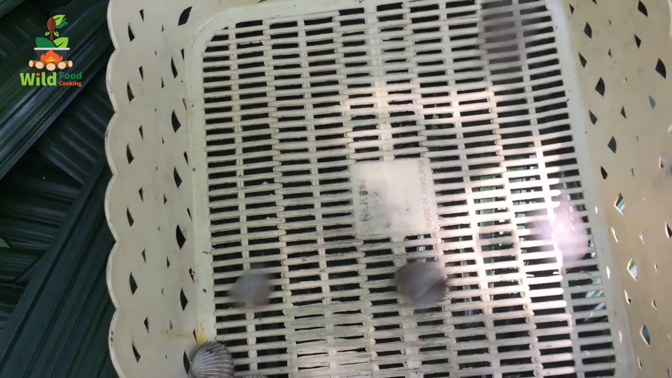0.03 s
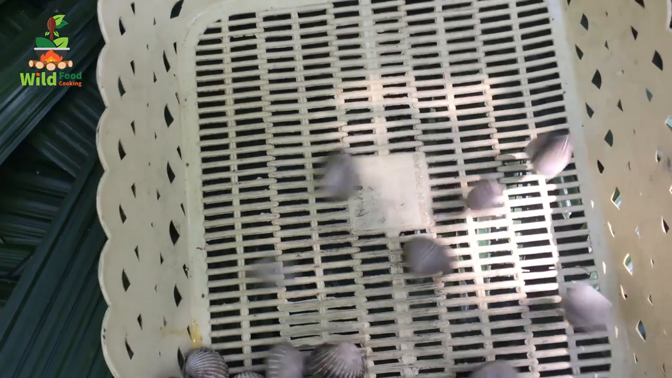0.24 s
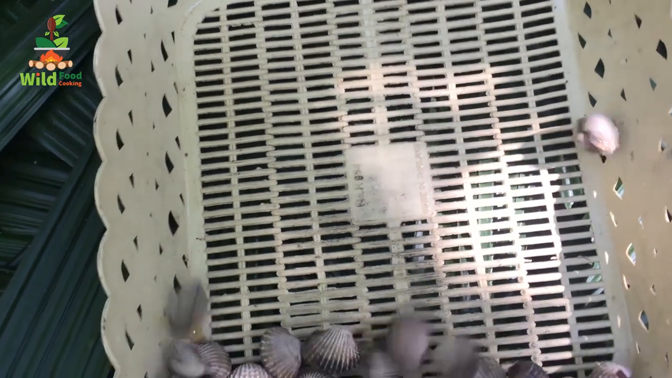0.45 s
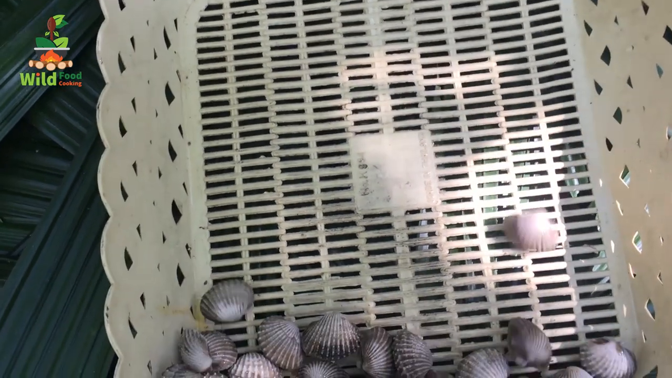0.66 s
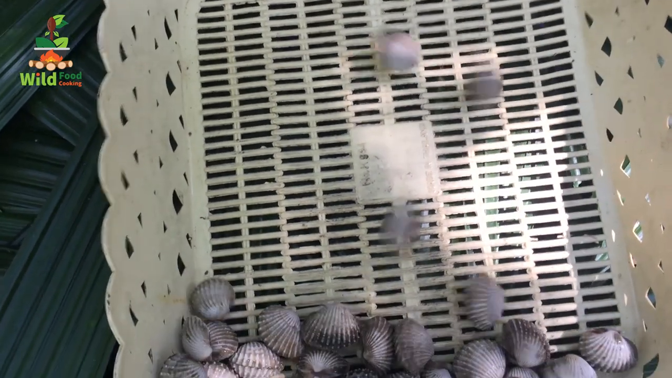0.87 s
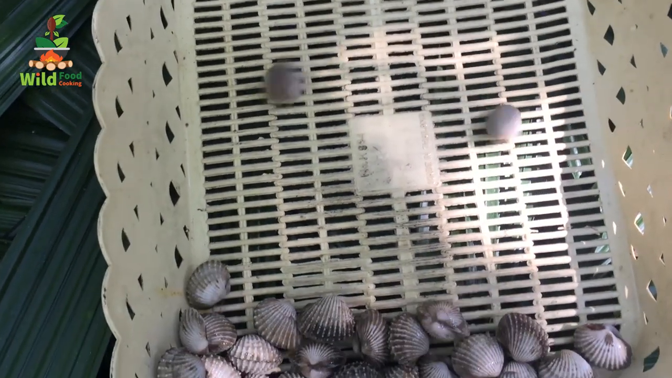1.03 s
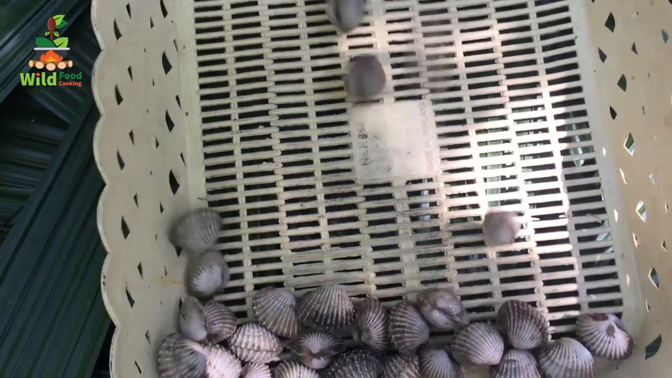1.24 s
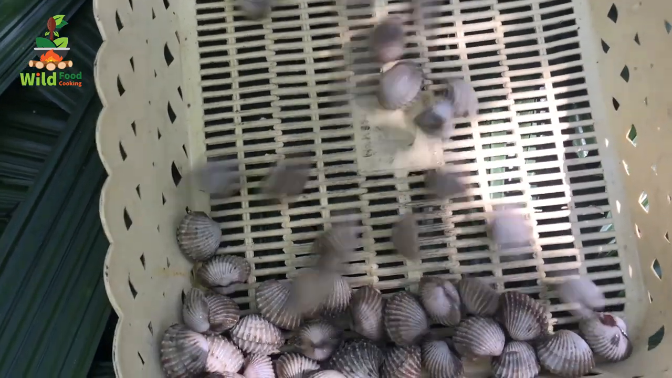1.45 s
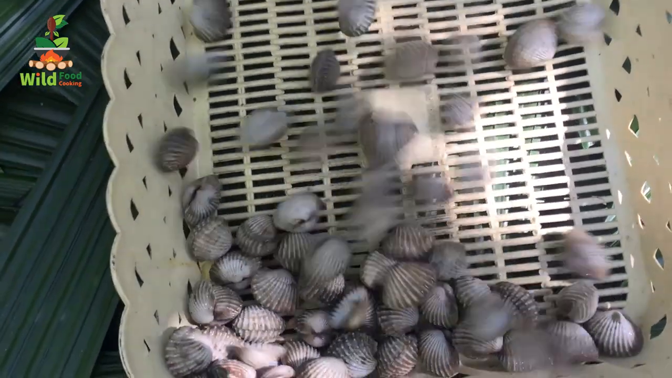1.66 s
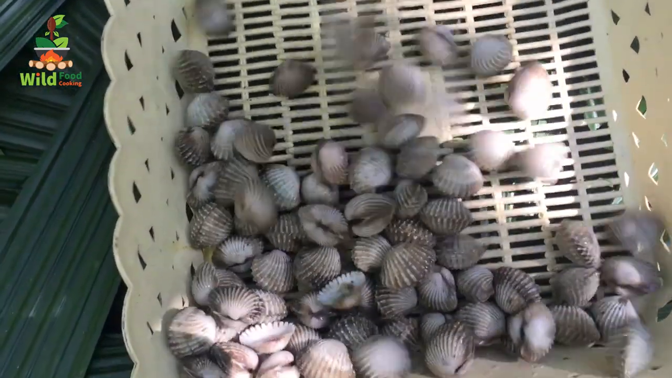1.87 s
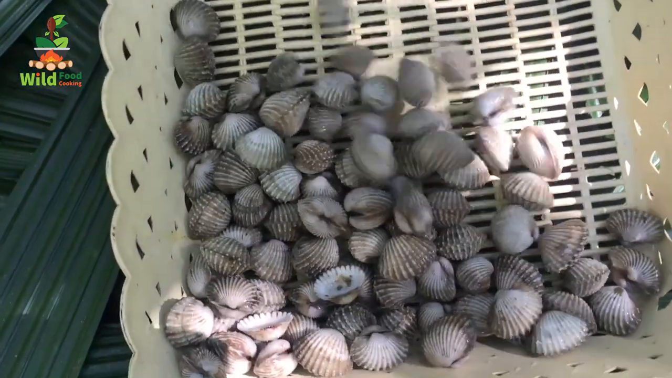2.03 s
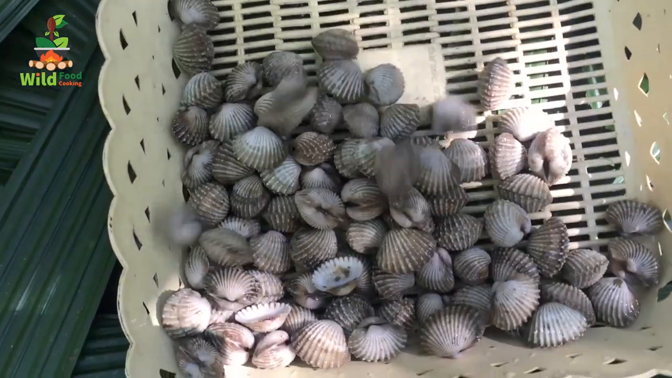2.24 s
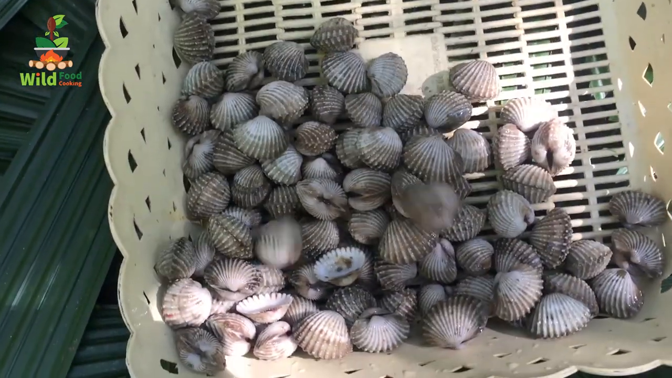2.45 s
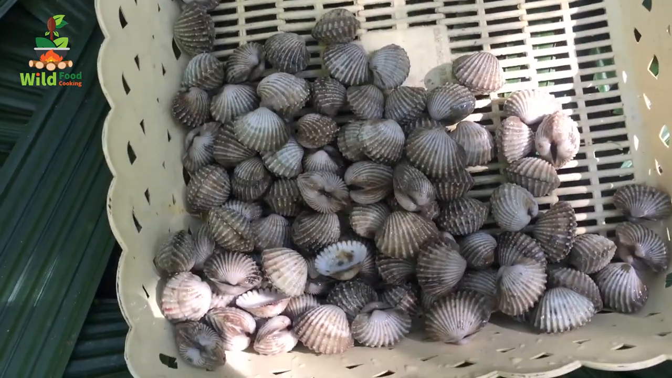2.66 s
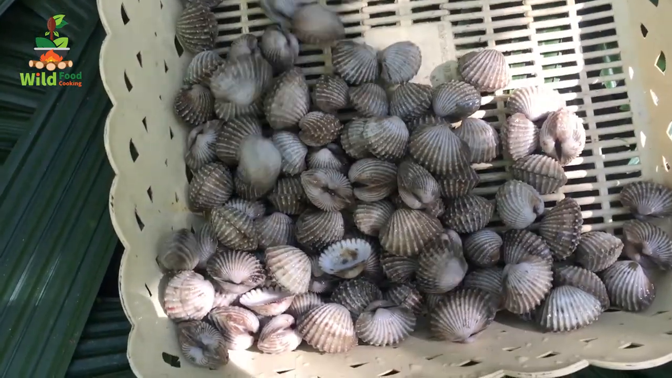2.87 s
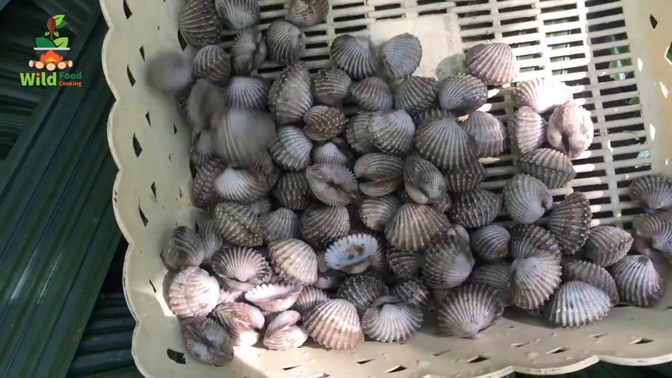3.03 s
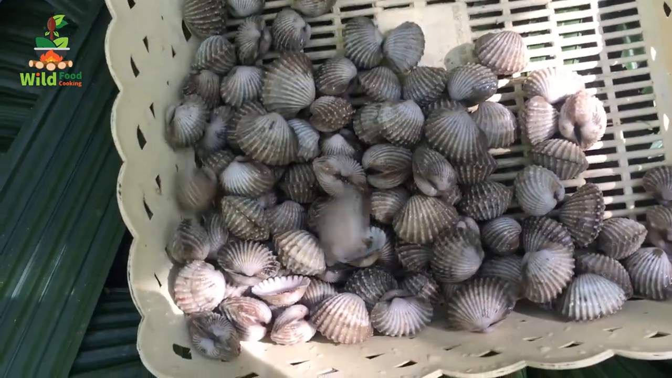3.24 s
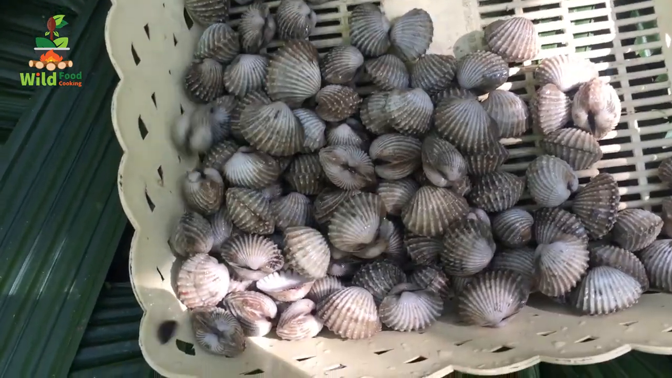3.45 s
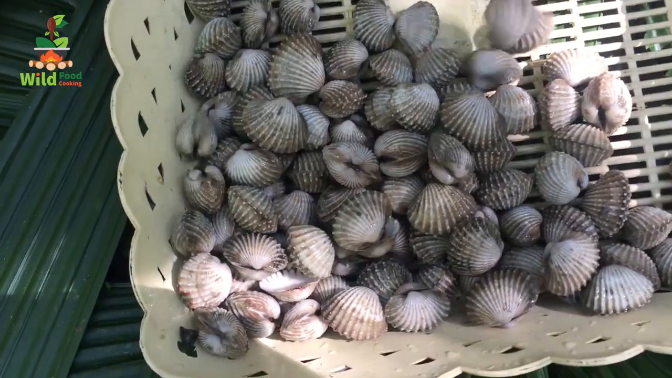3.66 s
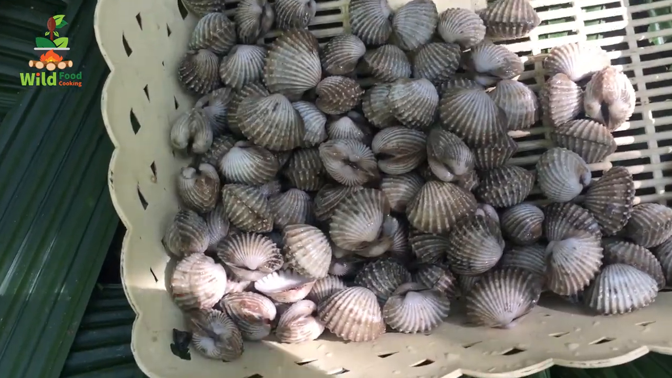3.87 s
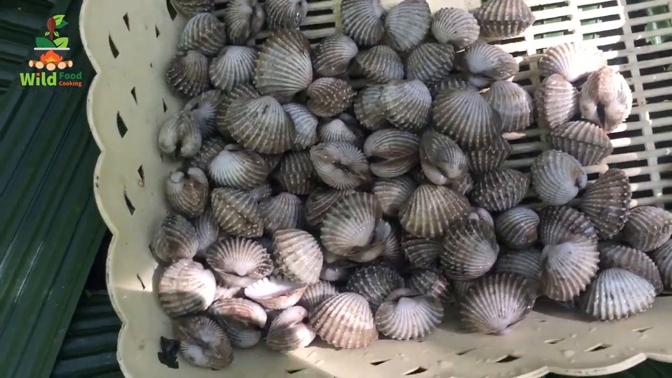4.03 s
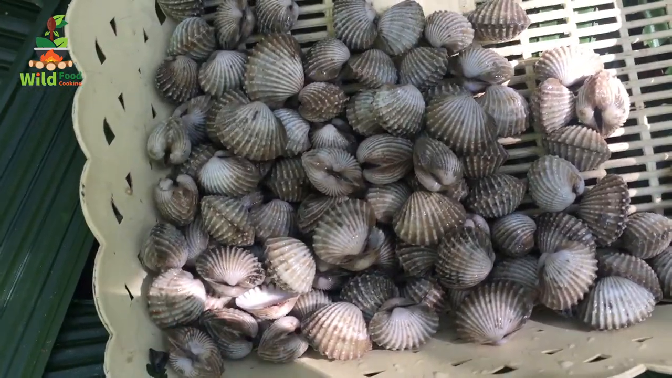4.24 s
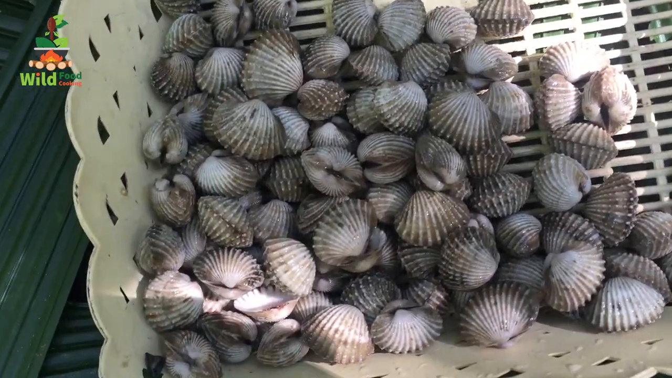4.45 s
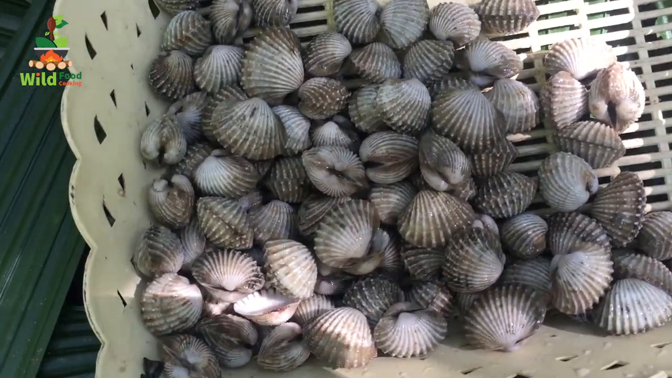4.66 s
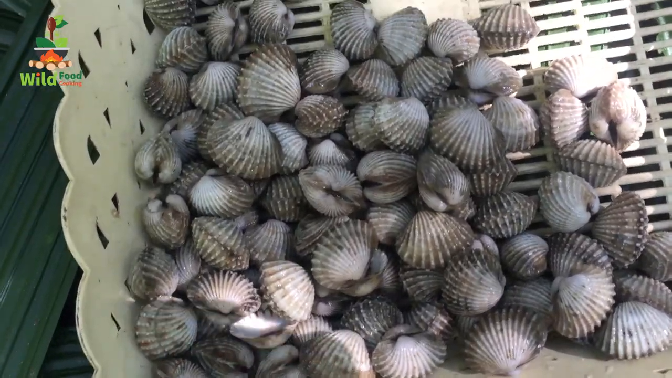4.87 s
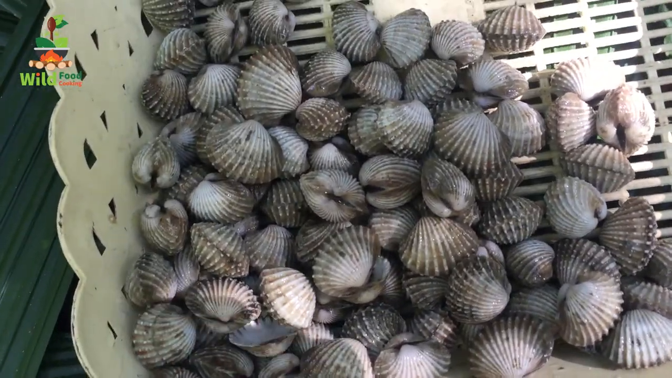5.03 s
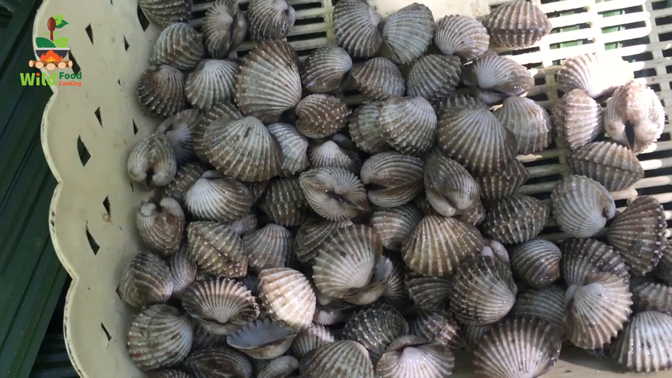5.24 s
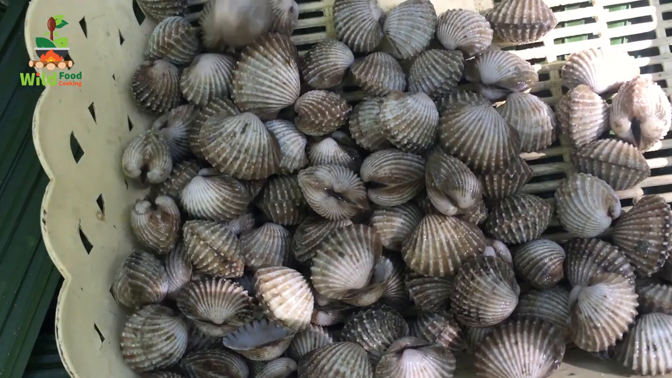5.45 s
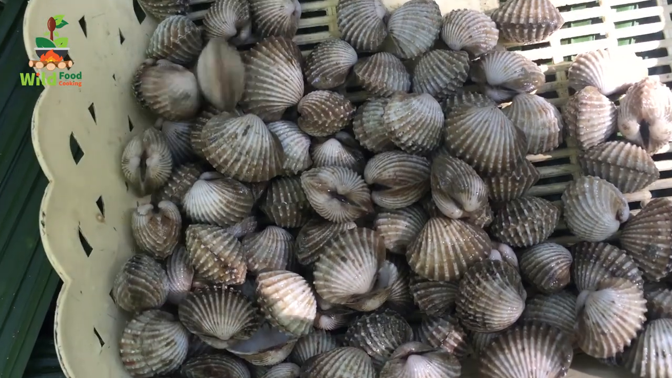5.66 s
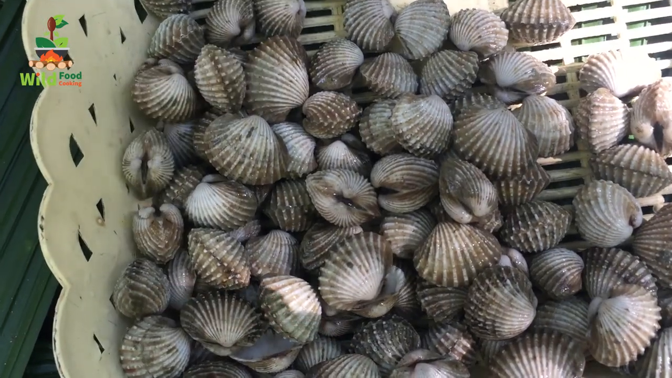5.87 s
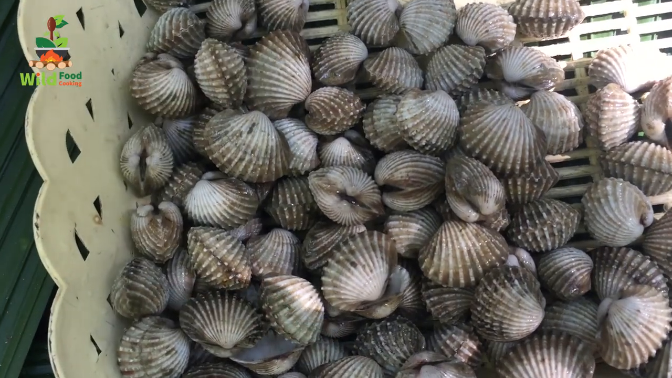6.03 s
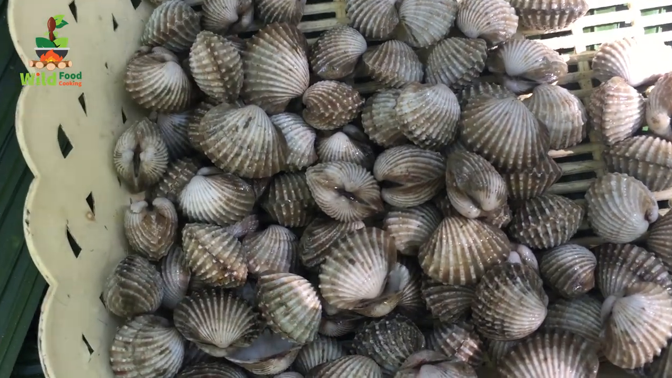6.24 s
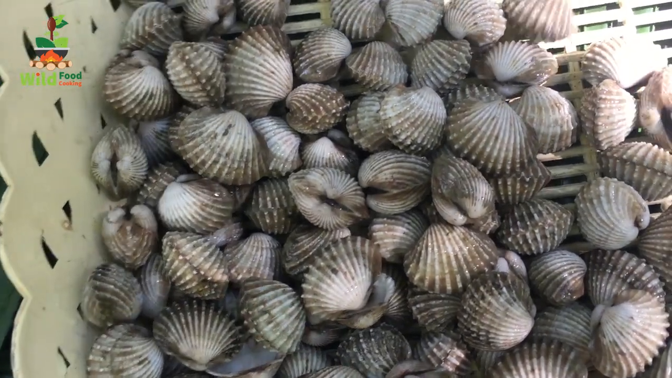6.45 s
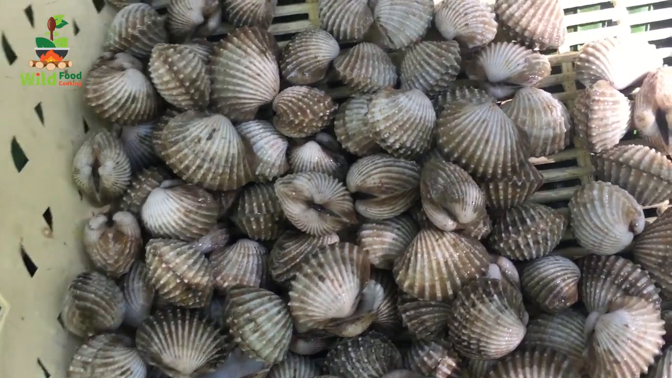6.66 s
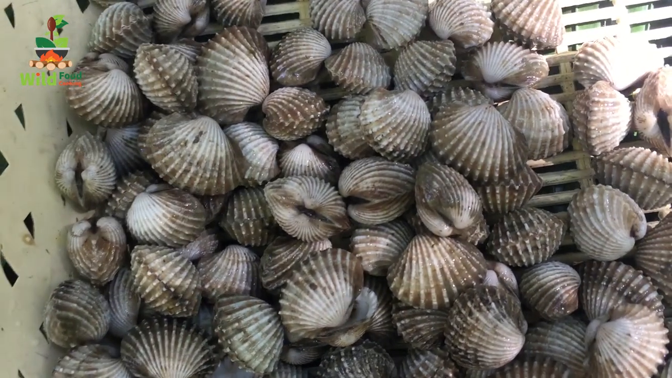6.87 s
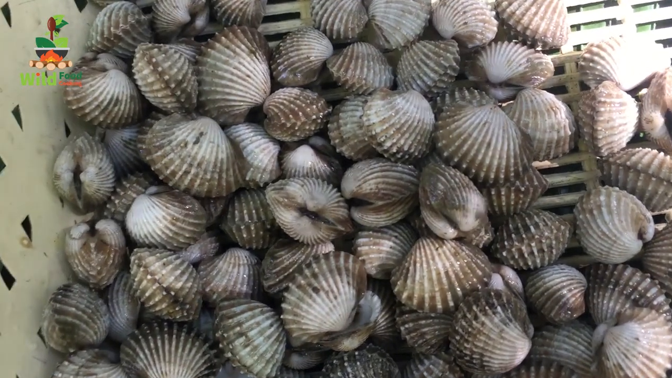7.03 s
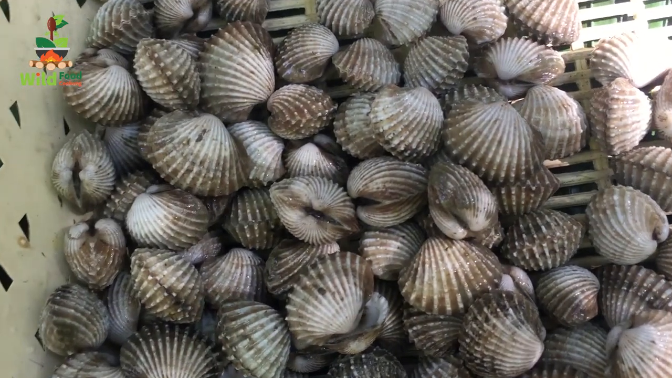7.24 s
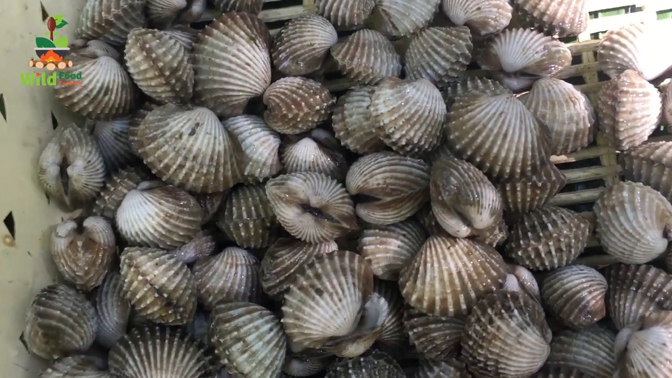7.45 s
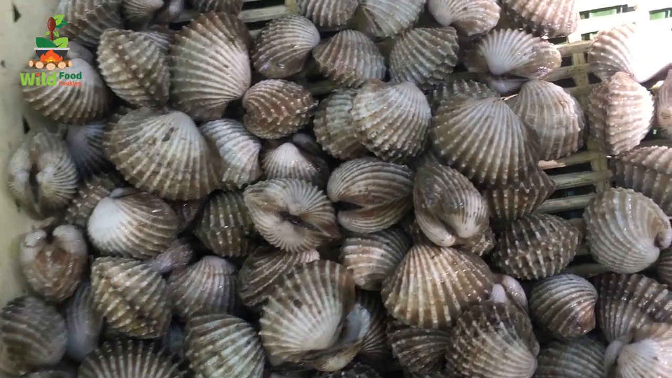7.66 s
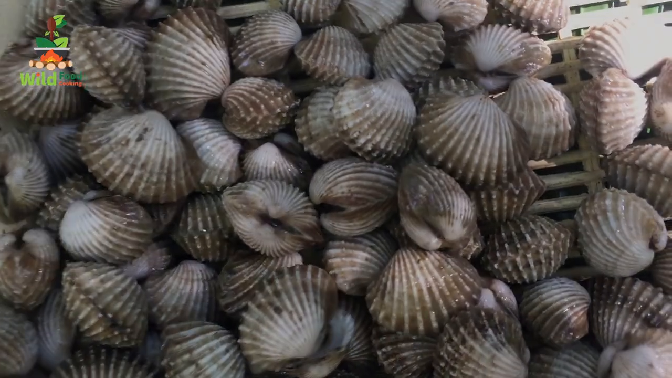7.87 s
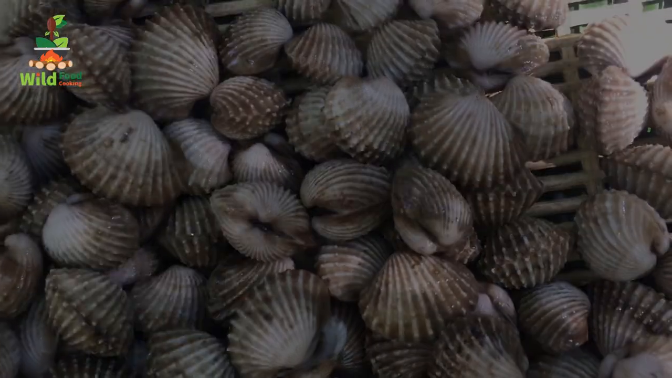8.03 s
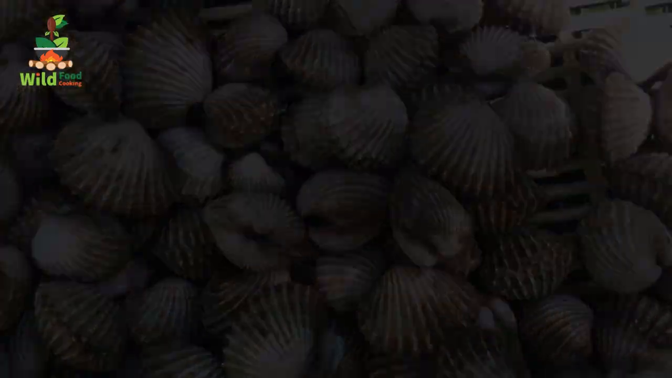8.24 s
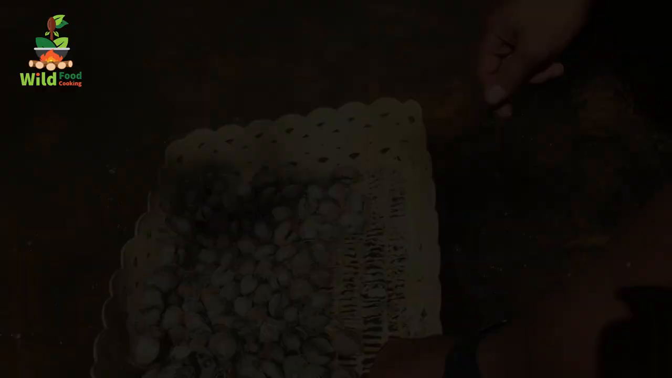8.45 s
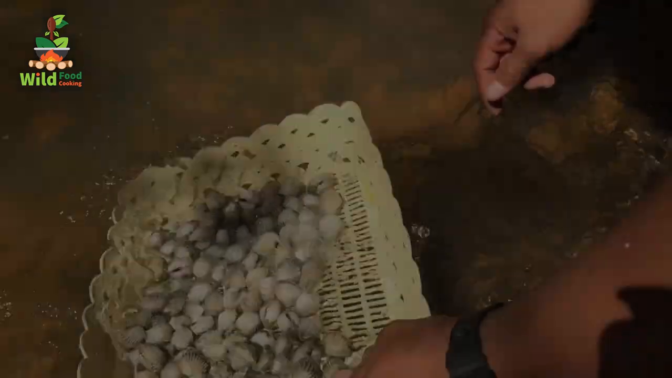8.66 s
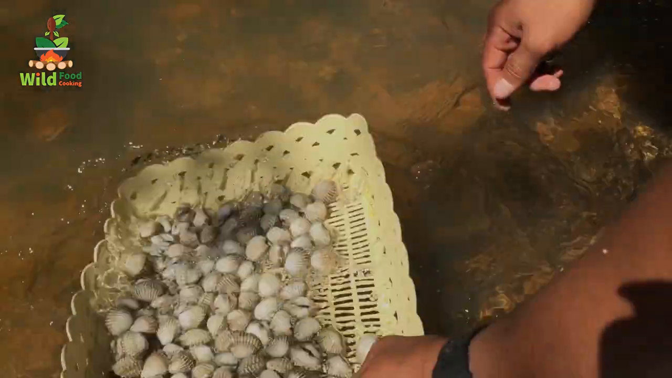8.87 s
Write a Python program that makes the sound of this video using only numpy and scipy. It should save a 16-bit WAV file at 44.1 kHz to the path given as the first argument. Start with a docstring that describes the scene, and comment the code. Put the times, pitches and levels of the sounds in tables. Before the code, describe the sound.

Hard ribbed shells pour clattering into a slatted plastic basket, stragglers clack, leaves rustle and bump, then shallow water abruptly gurgles.

```python
"""Cockles poured into a plastic basket

Wet shells hiss as they slide, then clack with damped modes and thump the slats over a jostling heap. Stragglers
drop in; close by, things rustle, drag and bump on leaves, built from slips, catches and noise. Resting shells
tick, then the scene changes to a shallow stream: ringing bubbles that rise in pitch, and splash. Quiet outdoor
air, a coloured noise, lies under everything."""
import sys
import numpy as np
from scipy import signal
from scipy.io import wavfile

SR = 44100
rng = np.random.default_rng(int(sys.argv[2]) if len(sys.argv) > 2 else 0)


def master_out(mix):
    """Clip the mix to full scale and print it as 16-bit PCM to the path in sys.argv[1]."""
    frames = np.transpose(np.atleast_2d(mix))
    ceiling = np.clip(frames, -1, 1)
    pcm = np.round(ceiling * 32767).astype(np.int16)
    wavfile.write(sys.argv[1], SR, pcm)


N = 392490  # length in samples


def amp(db):
    """Decibels to gain."""
    return 10 ** (np.asarray(db) / 20)


def unit(x):
    """Scales to rms 1."""
    return x / np.sqrt(np.mean(x ** 2) + 1e-20)


def seconds(length):
    """A time axis of the given length in seconds."""
    return np.arange(int(length * SR)) / SR


def fade(t, t60):
    """Free decay: 60 dB down after t60 seconds."""
    return np.exp(-np.log(1000) * t / t60)


def add(mix, s, sound):
    """Mixes a sound in at time s."""
    part = mix[max(0, round(s * SR)):][:len(sound)]
    part += sound[:len(part)]


def colour(x, points, size=4096):
    """Causal minimum-phase filter with the given spectrum, so that attacks stay sharp."""
    hz, db = np.transpose(points)
    bin_hz = abs(np.fft.fftfreq(size, 1 / SR))
    gain_db = np.interp(np.log(bin_hz + 1), np.log(hz), db)
    log_gain = np.log(amp(gain_db))
    taps = np.fft.ifft(np.exp(np.conj(signal.hilbert(log_gain)))).real
    return signal.oaconvolve(x, taps[:size // 2])[:len(x)]


def ticks(per_s, spread_db, most=4):
    """Randomly timed impulses of either sign, most small and a few large."""
    when, size, side = rng.random((int(per_s * N / SR), 3)).T
    train = np.zeros(N)
    level_db = spread_db * np.minimum(-np.log1p(-size), most)
    train[(when * N).astype(int)] = np.sign(side - .5) * amp(level_db)
    return train


def grains(lo_hz, hi_hz, cycles, per_s, spread_db, glide=0, count=16):
    """Brief rings at scattered pitches, high ones more often; equal power per Hz."""
    total = np.zeros(N)
    for hz in np.geomspace(lo_hz, hi_hz, count):
        t = seconds(cycles / hz)
        bend = 1 + glide * t / t[-1]
        ring = np.sin(2 * np.pi * hz * t * bend) * fade(t, t[-1])
        train = ticks(per_s * np.sqrt(hz / lo_hz), spread_db)
        total += np.sqrt(hz) * unit(signal.oaconvolve(train, ring)[:N])
    return unit(total)


def swells(rows):
    """The gain of a series of strokes, 20 dB down one rise before and one fall after each peak."""
    roundness = 1.12  # 1 = pointed peak, 2 = bell
    t, power = np.arange(N) / SR, np.zeros(N)
    for s, db, rise, fall in rows:
        away = np.maximum((s - t) / max(rise, 1 / SR), (t - s) / max(fall, 1 / SR))
        near = away < 3
        power[near] += amp(db - 20 * away[near] ** roundness) ** 2
    return np.sqrt(power)


def modes(lo_hz, hi_hz, t60, length, count, crack=0):
    """Every shell and spot of the basket has its own modes; those starting in step make a crack."""
    t = seconds(length)
    hz = lo_hz + (hi_hz - lo_hz) * (np.arange(count) + rng.random(count)) / count
    decay = t60 * rng.uniform(.6, 1.4, count)
    strength = crack + rng.standard_normal(count)
    return strength @ (np.sin(2 * np.pi * hz[:, None] * t) * fade(t, decay[:, None]))


# Background spectrum of the outdoor air: (pitch_hz, level_db)
AIR_COLOUR = [(25, -29), (43, -13), (62, -4), (110, -15), (300, -21), (1000, -22), (7500, -31),
              (16000, -35)]


def air():
    """Quiet outdoor air: steady noise with most of its weight in the lows."""
    return amp(-70) * unit(colour(rng.standard_normal(N), AIR_COLOUR))


# Strokes of wet shells sliding towards the edge: (peak_s, level_db, rise_s, fall_s)
SLIDE_STROKES = [(0, -43, .05, 0.42), (.78, -47, .22, .11), (1.55, -37.5, 0.48, 1), (2.71, -45.5, .22, .28),
                 (3.44, -58, .3, .1), (3.52, -41.5, .07, 0.047)]
# Spectrum of the scraping shells: (pitch_hz, level_db)
SLIDE_SPECTRUM = [(100, -18), (300, -15.5), (850, -5), (1700, 1.5), (5400, -1), (10000, -5.5),
                  (13000, -5.5), (16000, -6.5)]


def slide():
    """Wet ribbed shells scrape along before they fall: dense small ticks and noise make a fine, even hiss."""
    ribs = unit(ticks(per_s=6000, spread_db=2.5))
    hiss = ribs + 0.66 * rng.standard_normal(N)
    return swells(SLIDE_STROKES) * unit(colour(hiss, SLIDE_SPECTRUM))


def contact(ring, touches, pile_db, pile_t60):
    """A shell rings at each touch; the blow then rattles on briefly through the heap."""
    t = np.arange(len(touches)) / SR
    rattle = rng.standard_normal(len(t)) ** 3 * (fade(t, pile_t60) + 2 * fade(t, .022))
    blows = touches + amp(pile_db) * rattle / np.linalg.norm(rattle)
    sound = signal.fftconvolve(blows, ring)[:len(t)]
    return sound / np.sqrt(np.mean(sound[:176] ** 2))  # rms 1 over the first 4 ms


def clack(bright_db, count=3):
    """The hollow middle modes of a closed shell and the hard treble modes of its rim, all quickly damped."""
    touches = np.zeros(int(.08 * SR))
    touches[0] = 1
    # the ribs catch a few more times within about two milliseconds
    touches[rng.integers(8, 90, count)] = .28 * rng.standard_normal(count)
    hollow = modes(1300, 5000, t60=.0065, length=.02, count=18, crack=.6)
    rim = modes(5000, 10000, t60=.005, length=.02, count=18, crack=1.1)
    tip = modes(10000, 16000, t60=.0033, length=.02, count=18, crack=.8)
    hollow = contact(hollow, touches, pile_db=-1.0, pile_t60=0.12)
    rim = contact(rim, touches, pile_db=-6.0, pile_t60=0.066)
    tip = contact(tip, touches, pile_db=-6, pile_t60=0.025)
    # a brighter blow reaches further up the rim's modes
    treble = amp(-1.5) * rim + amp(-8.0 + 0.081 * bright_db) * tip
    return (hollow + amp(bright_db) * treble) / np.hypot(1, amp(bright_db))


def hollow_knock(hz):
    """A dull clack in which one mode of the shell stands out."""
    note_gain, note_t60 = 2 * amp(-2), 0.014  # peak gain, s
    knock = amp(-2) * clack(bright_db=-10)
    t = np.arange(len(knock)) / SR
    return knock + note_gain * np.sin(2 * np.pi * hz * t) * fade(t, note_t60)


def thump():
    """The slatted plastic gives way for a moment, then answers with dense, well damped modes."""
    slats = modes(45, 1500, t60=0.045, length=.12, count=24)
    body = modes(50, 800, t60=.11, length=.12, count=14)
    sound = slats + amp(-9) * body
    sound = sound * (1 - fade(np.arange(len(sound)) / SR, 0.014))  # soft onset
    return sound / np.sqrt(np.mean(sound[:350] ** 2))  # rms 1 over the first 8 ms


# How hard the poured shells tumble over each other, before colouring: (time_s, level_db)
TUMBLE = [(0, -34.5), (.3, -38), (.42, -44.5), (.53, -39), (.7, -45.5), (.82, -49.5), (.92, -63),
          (1.09, -42.5), (1.2, -45), (1.37, -40), (1.45, -27), (1.55, -39), (1.62, -23.5), (1.8, -26.5),
          (2.001, -28), (2.26, -35.5), (2.292, -63)]
# Distinct clacks and knocks, loud to faint, levels before colouring:
# (start_s, level_db, treble_over_middle_db, basket_thump_db)
DISTINCT_CLACKS = [(0.0404, -37, 5, -54), (0.0561, -30, -18, -39.5), (0.1149, -27, -8, -31),
                   (0.1564, -25, -1, -53.5), (.196, -33, 21, -59), (0.2095, -27, 1.5, -26.5),
                   (0.2343, -17, 15, -47), (0.2618, -17.5, -3.5, -28.5), (0.2832, -16, 8, -27),
                   (.314, -27, -2, -34), (.359, -33.5, -7, -35.5), (.374, -36, 5, -55),
                   (0.4262, -25.5, -7, -39), (.4332, -23, 9, -41), (.447, -33, -12, -34),
                   (.4724, -16.5, -5, -32.5), (0.4936, -31, 21, -40), (0.5089, -30, 17, -50),
                   (0.53, -26, 4, -43.5), (.572, -30, 8, -64), (.5943, -28.5, 2, -40.5),
                   (.667, -28, -11, -39), (0.7351, -32.5, 3, -62), (.752, -37, 20, -60),
                   (.7713, -31.5, 11, -60), (.88, -38, 11, -49), (.924, -22, -2, -31), (.932, -26, -4, -45),
                   (0.9792, -22, -4, -27.5), (.985, -24, -3, -34.5), (1.0042, -34, -8, -40),
                   (1.053, -25, -1, -33), (1.0651, -28, -4, -36), (1.0846, -29.5, 10, -61),
                   (1.0968, -28.5, 9, -43), (1.1118, -27, 1, -44), (1.1486, -28, 1, -34.5),
                   (1.173, -20.5, 18, -51), (1.1905, -29.5, 13, -58), (1.282, -29, -3, -28.5),
                   (1.2916, -26.5, -1, -39), (1.3322, -16.5, 0.5, -28.5), (1.3654, -35, 6, -56),
                   (1.386, -15.5, 6.5, -48), (1.4106, -18.5, 3, -32), (1.4394, -15, -0.5, -33.5),
                   (1.448, -19, 6, -30.5), (1.4844, -20.5, 7.5, -30.5), (1.4971, -20.5, 5, -39),
                   (1.5188, -21, 31, -35.5), (1.5222, -19, 6, -31), (1.58, -17, -1, -31),
                   (1.599, -14.5, -7, -29.5), (1.638, -24, 9, -48), (1.676, -18, 15, -28),
                   (1.7093, -23, 16, -35), (1.7271, -14, 7, -27), (1.7503, -17, 12.5, -33.5),
                   (1.7638, -22, -1, -33), (1.781, -14.5, -0.5, -29), (1.8109, -28, 4, -36),
                   (1.8533, -20.5, 4, -42), (1.8756, -26, 1, -36), (1.8808, -24, 9.5, -41),
                   (1.9173, -32, 3, -27), (1.9322, -25.5, 19, -39), (1.974, -21.5, -2, -35.5),
                   (1.9907, -17, 0.5, -36.5), (2.0068, -14, 1, -30), (2.023, -19.5, 9, -44),
                   (2.041, -20, 15, -55), (2.0598, -20.5, 9, -38.5), (2.0692, -21.5, 16, -54),
                   (2.1048, -16.5, 6.5, -30.5), (2.1488, -19.5, 14, -35), (2.2159, -20.5, -3, -31),
                   (2.222, -24.5, -3, -40), (2.3215, -13.5, 19, -40.5), (2.373, -27.5, 10, -61),
                   (2.3977, -27.5, 16, -62), (2.408, -28, 9, -60), (2.4856, -27.5, -3.5, -63),
                   (2.5334, -37.5, -1, -70), (2.548, -39.5, -2, -73), (2.6035, -28, 15, -67),
                   (2.62, -30.5, -3, -58), (2.639, -34.5, 10, -71), (2.6483, -34, 5, -68),
                   (2.6812, -33.5, 1, -48.5), (2.738, -46, 2, -51), (2.7851, -24, 9, -58),
                   (2.8966, -15, 7.5, -37.5), (2.9011, -23.5, 10, -44), (2.9124, -33, -3, -58),
                   (2.9193, -30.5, 7.5, -59), (2.9421, -28, 8, -44), (2.953, -17.5, 8.5, -28.5),
                   (2.9626, -17.5, 3, -32), (2.973, -23, -3, -40), (3.01, -26.5, 14, -37.5),
                   (3.02, -22, -2, -35.5), (3.043, -15.5, 3, -30), (3.067, -29, 0.5, -49),
                   (3.0734, -34, -4, -47), (3.0884, -29, 2.5, -67.5), (3.124, -32.5, -2, -51),
                   (3.137, -37, 5, -53), (3.1457, -32.5, -3, -44.5), (3.1775, -33.5, 4, -62),
                   (3.1926, -39, -1, -55), (3.2054, -21.5, 4.5, -41), (3.2112, -22.5, 2, -45),
                   (3.2202, -30, 12, -47), (3.262, -26.5, 16, -67.5), (3.2839, -31, 2, -57),
                   (3.2929, -32.5, -12, -63), (3.347, -41.5, -2, -75), (3.379, -29.5, 24, -67.5),
                   (3.382, -25.5, 18, -69), (3.3844, -20.5, 22, -68), (3.397, -40, 7, -77),
                   (3.4618, -20, 27, -71), (3.477, -36, 9, -59), (3.5872, -36, 12, -68),
                   (3.7457, -15, 15, -33.5), (3.755, -32.5, 0, -50), (3.77, -34.5, 1.5, -49),
                   (3.82, -53, -3, -53), (3.8963, -38.5, -6, -59), (4.1197, -53, 2, -79),
                   (5.5397, -13.5, 11.5, -34), (5.579, -33.5, 0, -50), (5.604, -11, 8, -29.5),
                   (5.6365, -38, 3, -62), (5.6615, -42.5, 6, -71), (5.7108, -36, 1, -67),
                   (5.7466, -47, -6, -70), (5.7683, -38, 5, -61), (5.7773, -47, 4, -66),
                   (5.783, -52, 12, -78), (5.8204, -39, 3.5, -58.5), (5.8488, -51, -2, -77),
                   (6.4719, -22.5, -4.5, -27.5), (6.48, -17, 1, -48.5), (6.678, -35.5, -1, -46),
                   (6.693, -29.5, -2, -56), (7.41, -58, -14, -67), (7.533, -54.5, -8, -69),
                   (8.393, -56.5, 0, -71)]


def unrest():
    """How much the heap rattles: with the flow of the pour, and briefly after each distinct clack."""
    by_blow_db, by_basket_db = -27, -13  # stirred by the clack itself and through the basket
    settle_t60 = 0.27  # s
    times, flow_db = np.transpose(TUMBLE)
    power = amp(np.interp(np.arange(N) / SR, times, flow_db, right=-np.inf)) ** 2
    t = seconds(.5)
    for s, db, _, thump_db in DISTINCT_CLACKS:
        stir = amp(db + by_blow_db) ** 2 + amp(thump_db + by_basket_db) ** 2
        add(power, s, stir * fade(t, settle_t60) ** 2)
    return np.sqrt(power)


# Shells that knock with one clear note, levels before colouring:
# (start_s, level_db, pitch_hz, basket_thump_db)
HOLLOW_KNOCKS = [(1.2468, -31, 3200, -43), (1.393, -18.5, 6610, -47), (2.3508, -26, 3340, -42),
                 (2.3588, -24, 1600, -43), (3.2354, -23.5, 3440, -45), (3.2452, -25.5, 3460, -60),
                 (3.8745, -25.5, 2100, -46), (5.0513, -40.5, 3095, -65), (7.4355, -45, 2270, -67)]
# Spectrum shared by the shells: (pitch_hz, level_db)
SHELL_SPECTRUM = [(100, -16), (1200, -6), (2400, 2.5), (3600, 0), (5000, 0), (6700, 4), (9400, 0),
                  (10400, -1.5), (12000, 5), (15500, -1.5)]
# Spectrum of the plastic basket: (pitch_hz, level_db)
BASKET_SPECTRUM = [(30, -28.5), (60, -12), (100, -5), (180, -11.5), (300, -7), (380, -2), (450, -4),
                   (560, 4), (700, 1), (930, 4), (1200, -5.5), (1600, -6)]


def pour(count=24):
    """Distinct clacks over the jostling of the heap; both shake the basket."""
    shells, basket, small, shake = np.zeros((4, N))
    for s, db, bright_db, thump_db in DISTINCT_CLACKS:
        add(shells, s, amp(db) * clack(bright_db))
        add(basket, s, amp(thump_db) * thump())
    for s, db, hz, thump_db in HOLLOW_KNOCKS:
        add(shells, s, amp(db) * hollow_knock(hz))
        add(basket, s, amp(thump_db) * thump())
    # the jostling: 300 touches a second, shared among dull to bright shells
    for bright_db in np.linspace(-8, 16, count):
        touches = ticks(per_s=300 / count, spread_db=5, most=2.4)
        small += signal.oaconvolve(touches, clack(bright_db))[:N]
        shake += signal.oaconvolve(touches, thump())[:N]
    rattle = unrest()
    # the fuller the basket, the less the jostling shakes it: 2 dB less each second
    filling_db = -2 * np.arange(N) / SR
    shells = shells + rattle * unit(small)
    basket = basket + amp(-7.5 + filling_db) * rattle * unit(shake)
    return colour(shells, SHELL_SPECTRUM) + colour(basket, BASKET_SPECTRUM)


def friction(points, spread_db, cycles, slips, smooth):
    """Sharp slips and small ringing catches over a smooth hiss, in the colour of the surface."""
    catches = grains(250, 15000, cycles, per_s=18, spread_db=spread_db, count=22)
    snaps = unit(ticks(per_s=900, spread_db=spread_db))
    hiss = rng.standard_normal(N)
    return unit(colour(catches + slips * snaps + smooth * hiss, points))


# Strokes of light rubbing on the leaves: (peak_s, level_db, rise_s, fall_s)
RUSTLE_STROKES = [(4.16, -59, .07, 0.11), (4.28, -58.5, 0.062, 0.044), (4.37, -61, 0.076, 0.094),
                  (4.58, -64, 0.093, 0.23), (4.97, -54, 0.17, 0.084), (5.06, -44.5, 0.032, .05),
                  (5.11, -45, 0.064, 0.043), (5.22, -60.5, 0.098, .1), (5.375, -45.5, 0.14, 0.083),
                  (5.905, -55.5, 0.033, 0.081), (6.045, -60.5, 0.095, 0.14), (6.19, -55.5, 0.049, 0.12),
                  (6.29, -51.5, 0.15, 0.041), (6.355, -48, 0.015, 0.088), (6.5, -40, 0.16, .12),
                  (6.73, -39.5, 0.097, 0.18), (7.03, -51, 0.18, 0.39), (7.27, -44, 0.049, 0.054),
                  (7.46, -67, 0.087, .13), (7.58, -64, 0.034, .06), (7.77, -67, .06, 0.1)]
# Spectrum of the leaves: (pitch_hz, level_db)
RUSTLE_SPECTRUM = [(60, -13), (300, -10), (600, -10.5), (1300, -6.5), (2250, 0), (2550, -4), (2900, -0.5),
                   (3400, -2), (3800, 0), (4600, -6.5), (5500, -3), (8000, -8.5), (10400, -9.5),
                   (12500, -9.5), (16000, -11)]


def rustle():
    """Leaves rustle under light rubbing, with long catches and clear slips."""
    rubbing = friction(RUSTLE_SPECTRUM, spread_db=3.3, cycles=22, slips=.7, smooth=.7)
    return swells(RUSTLE_STROKES) * rubbing


# Dull bumps of things set down, level before the soft onset: (start_s, level_db, t60_s)
SET_DOWNS = [(5.106, -45, 0.026), (6.355, -39, 0.094), (6.472, -42, .09), (6.48, -27, 0.15),
             (6.678, -35, 0.17), (6.724, -28, 0.2), (6.887, -44, 0.16), (6.926, -56, 0.096),
             (6.968, -62, .15), (7.431, -50, 0.12)]
# Spectrum of the bumps: (pitch_hz, level_db)
BUMP_SPECTRUM = [(24, -52), (40, -26), (80, -5), (523, -5.5), (625, -2), (1300, -9), (1420, -7.5),
                 (1850, -9), (2360, -6.5), (8000, -17), (10400, -23), (17600, -120)]


def bumps():
    """Things are set down on the leaves: dull noise with a soft onset and a short decay."""
    force, t = np.zeros(N), seconds(.3)
    for s, db, t60 in SET_DOWNS:
        add(force, s, amp(db) * fade(t, t60) * (1 - fade(t, 0.0048)))
    return force * unit(colour(rng.standard_normal(N), BUMP_SPECTRUM))


# Strokes of dull dragging: (peak_s, level_db, rise_s, fall_s)
DRAG_STROKES = [(5.4, -57, .12, 0.054), (6.38, -62, .03, .2), (6.5, -51.5, 0.18, .12),
                (6.75, -48.5, .1, 0.43), (6.9, -47.5, 0.022, .06), (7.05, -54, .3, 0.36),
                (7.27, -50, 0.04, 0.054)]
# Spectrum of the dragging: (pitch_hz, level_db)
DRAG_SPECTRUM = [(40, -18), (150, -6.5), (350, -4), (700, -7), (1150, -5.5), (1800, -18), (4000, -19.5)]


def drag():
    """Something is dragged over the leaves in little dull catches."""
    dragging = friction(DRAG_SPECTRUM, spread_db=4.2, cycles=13, slips=.4, smooth=.3)
    return swells(DRAG_STROKES) * dragging


# Thin ticks from the resting wet shells, level of the top modes: (start_s, level_db)
RESTING_TICKS = [(8.1708, -52.5), (8.2114, -60.5), (8.3832, -61.5)]


def resting():
    """A shell at rest ticks mostly with the highest modes of its rim, the lower ones fainter."""
    out = np.zeros(N)
    for s, db in RESTING_TICKS:
        top = unit(modes(12000, 15500, t60=.009, length=.01, count=10))
        lower = unit(modes(1500, 12000, t60=.009, length=.01, count=20))
        add(out, s, amp(db) * (top + amp(-6.5) * lower))
    return out


# Loudness of the flowing water: (time_s, level_db)
STREAM_FLOW = [(8.46, -26), (8.52, -29), (8.63, -29), (8.67, -29), (8.81, -31), (8.83, -27), (8.87, -28),
               (8.9, -35.5)]
# Spectrum of the water: (pitch_hz, level_db)
STREAM_SPECTRUM = [(35, -61), (60, -32), (262, -24.5), (338, -19), (417, -9.5), (458, -16.5), (566, -1),
                   (715, -6), (842, -10), (991, -5), (1950, -1), (6000, -13.5), (10300, -23.5),
                   (13900, -19), (16000, -27)]


def stream():
    """Bubbles ring with a rising pitch over the splash of shallow water; the large ones gurgle."""
    start_s = 8.461  # cuts in at once
    bubbles = grains(488, 9350, cycles=37, per_s=35, spread_db=3.0, glide=0.099, count=36)
    splash = unit(ticks(per_s=2500, spread_db=2.5))
    t = np.arange(N) / SR
    flow = amp(np.interp(t, *np.transpose(STREAM_FLOW))) * (t > start_s)
    return flow * unit(colour(bubbles + 1.02 * splash, STREAM_SPECTRUM))


def scene():
    """Everything is close and dry, over quiet outdoor air, in one channel."""
    shells = slide() + pour() + resting()
    leaves = rustle() + bumps() + drag()
    return (air() + shells + leaves + stream())[None]


def record(dry, ceiling=0.78):
    """Only the sharpest peaks are rounded off; then a low-pass sets the band limit."""
    rounded = dry / (1 + (dry / ceiling) ** 4) ** .25
    lowpass = signal.firwin(255, 16100, window=("kaiser", 8), fs=SR)  # edge in Hz
    return signal.oaconvolve(rounded, lowpass[None], "same")


dry = scene()
out = record(dry)
master_out(out)
```